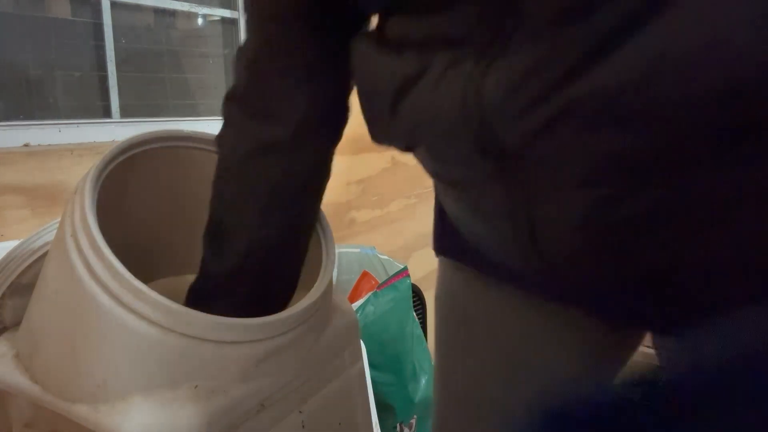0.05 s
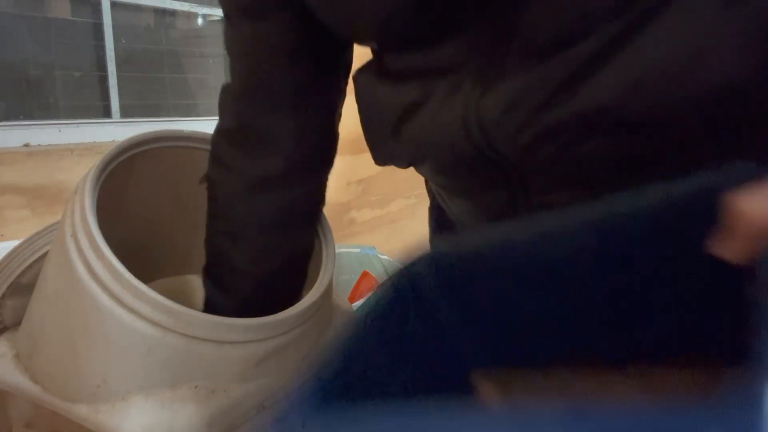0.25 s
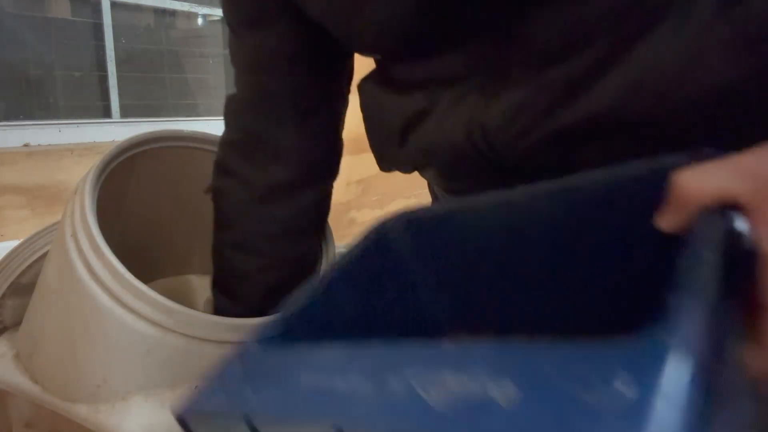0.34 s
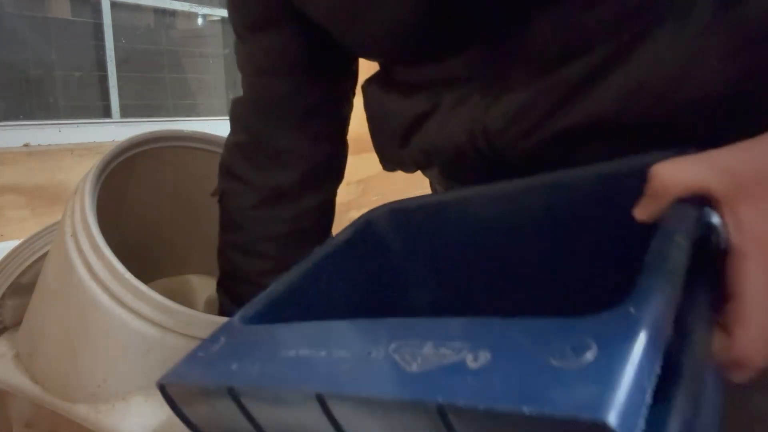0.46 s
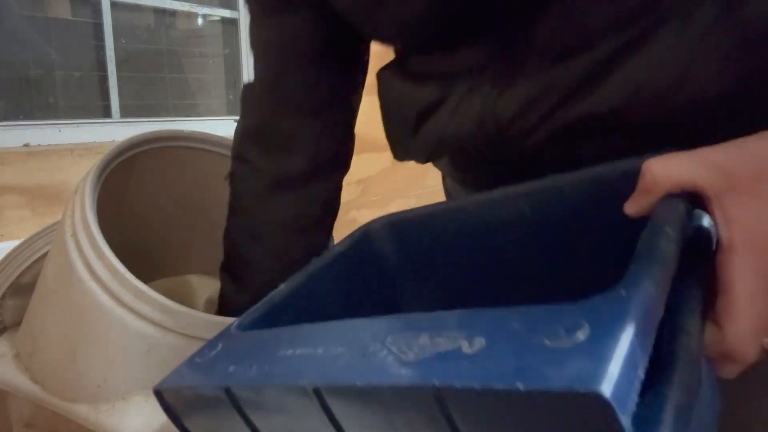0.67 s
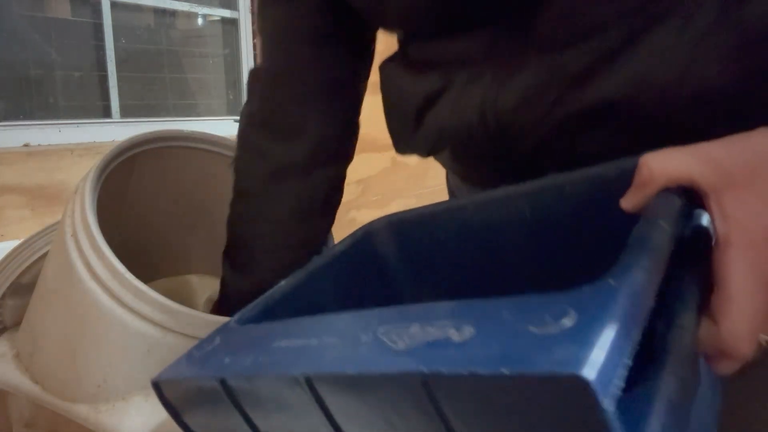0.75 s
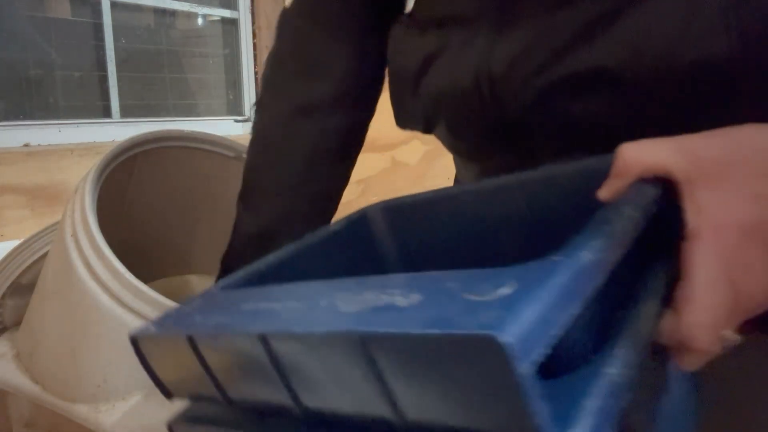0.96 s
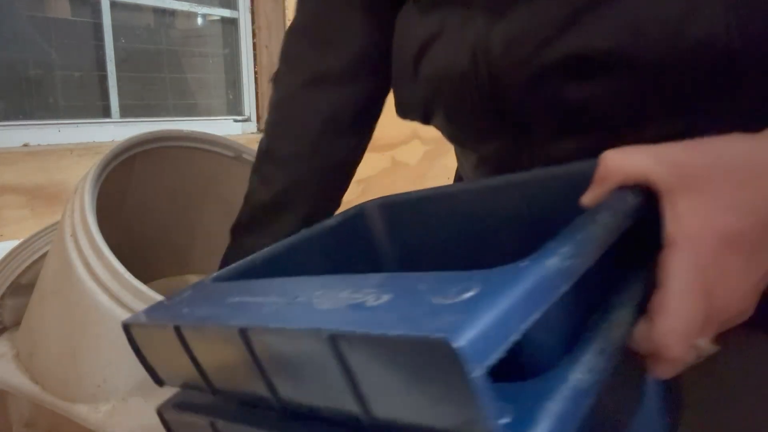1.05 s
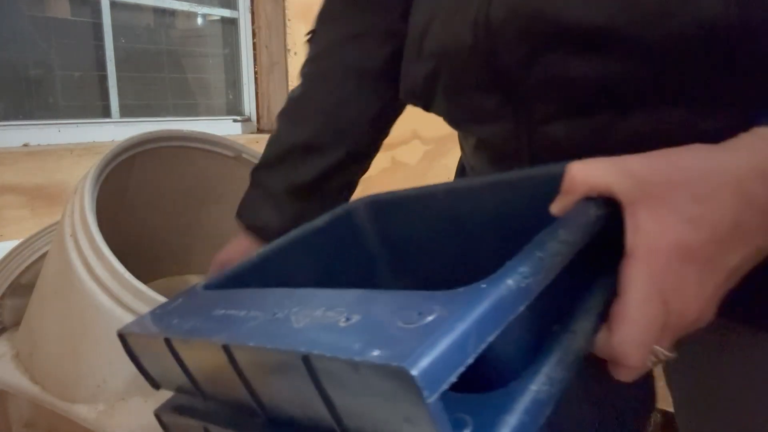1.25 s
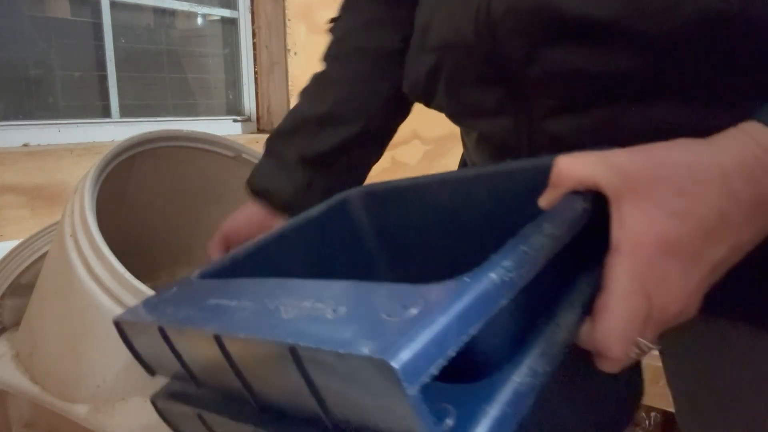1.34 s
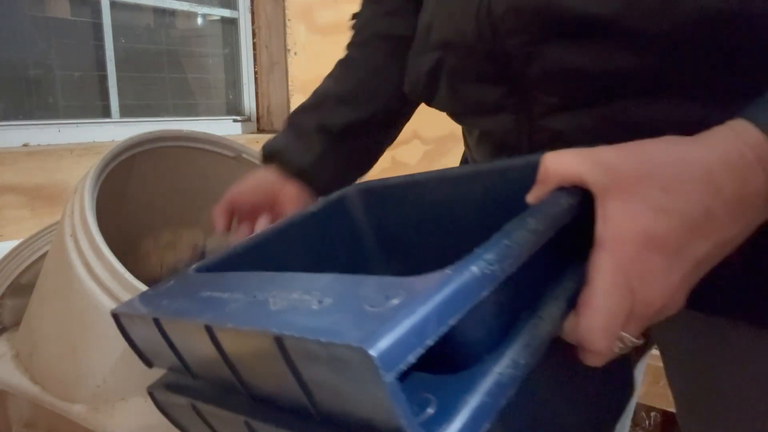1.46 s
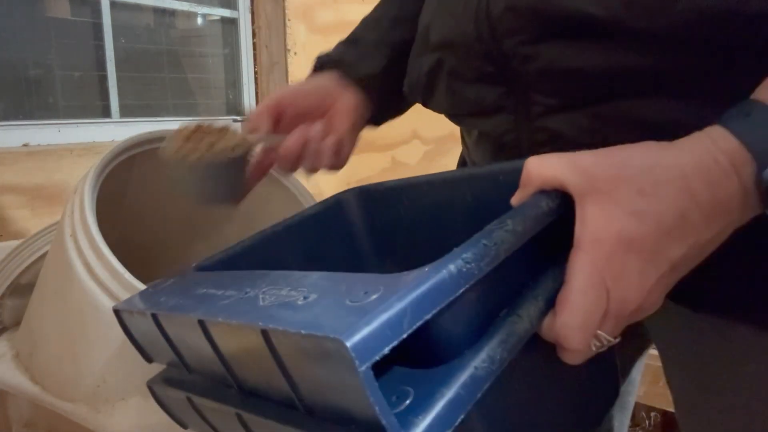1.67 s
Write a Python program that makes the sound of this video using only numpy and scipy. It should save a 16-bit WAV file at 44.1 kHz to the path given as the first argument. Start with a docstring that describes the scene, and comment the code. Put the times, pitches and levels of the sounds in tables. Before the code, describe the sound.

Close, dry recording in a small feed room: pellets hiss and grind, the barrel wall booms under the digging scoop, loose pellets crackle and tick as it lifts, then a sharp tap and quiet.

```python
"""A metal scoop digs through feed pellets in a plastic barrel, close by, in a small feed room.
Pellets crunch, hiss and snap: random trains of tiny collisions, filtered to each sound's spectrum.
The push rumbles and drones in the barrel wall; knocks, booms and clacks are decaying oscillations.
Most layers pass through a short diffuse reverberation, the hollow of barrel and room."""
import sys
import numpy as np
from scipy import signal
from scipy.fft import rfft, irfft
from scipy.io import wavfile

SR = 44100
rng = np.random.default_rng(int(sys.argv[2]) if len(sys.argv) > 2 else 0)


def wav_out(sig):
    """Save sig, one row per channel (or a flat mono array), as 16-bit PCM at SR to the path in sys.argv[1]."""
    wavfile.write(sys.argv[1], SR, np.round(np.clip(np.atleast_2d(sig).T, -1, 1) * 32767).astype(np.int16))


N = 74970
TIME = np.arange(N) / SR  # seconds

# spectrum of pellets grinding, also the duller body of snaps and scrapes: pitch_hz, relative level_db per Hz
GRIND_SPECTRUM = [(60, -47), (140, -6), (300, -7), (650, 0), (1100, 2.5), (1600, -2.5), (2200, -1.5),
                  (3300, -4), (5000, -4.5), (8000, -18), (16000, -34)]
# bright spectrum of single pellets snapping or ticking: pitch_hz, relative level_db per Hz
SNAP_SPECTRUM = [(300, -22), (2000, -11.5), (4500, 0), (7500, -0.5), (9700, 0), (12000, -1), (13500, -0.5),
                 (15000, -10), (16000, -6.5)]


def amp(db):
    """Level in decibels is twenty times the logarithm of the amplitude ratio returned here."""
    return 10 ** (np.asarray(db) / 20)


def unit(x):
    """Root-mean-square normalisation: the mean power becomes 1."""
    return x / np.sqrt(np.mean(x ** 2) + 1e-20)


def level(points):
    """Amplitude envelope: straight lines in decibels become a gain for every sample."""
    time_s, level_db = np.transpose(points)
    return amp(np.interp(TIME, time_s, level_db))


def read(points, hz):
    """Interpolation on a logarithmic frequency axis."""
    f, value = np.transpose(points)
    return np.interp(np.log(hz + 1), np.log(f + 1), value)


def through(x, response):
    """A linear system's output is its input convolved with its impulse response."""
    return signal.fftconvolve(np.atleast_2d(x), np.atleast_2d(response), axes=1)[:, :N]


def colour(spectrum, size=4096):
    """Minimum-phase filter: the Hilbert transform of the log gain gives the phase; energy 1."""
    hz = abs(np.fft.fftfreq(size, 1 / SR))
    log_gain = np.log(amp(read(spectrum, hz)))
    transfer = np.exp(signal.hilbert(log_gain).conj())
    h = np.fft.ifft(transfer).real[:size // 2]
    return h / np.linalg.norm(h)


def ring(modes):
    """Modal superposition: an impulse excites exponentially dying cosines; energy 1."""
    t = TIME[:SR // 2]
    h = np.zeros(len(t))
    for k, (hz, db, t60) in enumerate(modes):
        sign = (-1) ** k  # neighbouring modes start in opposite directions
        h += sign * amp(db - 60 * t / t60) * np.cos(2 * np.pi * hz * t)
    return h / np.linalg.norm(h)


def grains(per_s, spread_db, clump_db, clump_s):
    """Granular shot noise: random collisions of uneven size whose strength swells in clumps."""
    size = amp(spread_db * np.minimum(rng.exponential(1, N), 4))
    struck = rng.random(N) < per_s / SR
    clicks = size * rng.choice([-1, 1], N) * struck
    knots = rng.standard_normal(N)
    clumps = amp(clump_db * np.interp(TIME / clump_s, np.arange(N), knots))
    return unit(clicks * clumps)


def waver(hz, wander_hz, flutter_db, step_s):
    """Random frequency and amplitude modulation of a sine, whose phase is its summed frequency."""
    knots = rng.standard_normal((2, N))
    pitch, size = [np.interp(TIME / step_s, np.arange(N), k) for k in knots]
    phase = 2 * np.pi * np.cumsum(hz + wander_hz * pitch) / SR
    return unit(amp(flutter_db * size) * np.sin(phase))


def hollow(x, wet_db, mono_hz=170):
    """Diffuse reverberation: decaying noise, coherent between the sides only in the bass."""
    # decay of the reflections: pitch_hz, t60_s
    decay = [(100, 0.071), (700, 0.18), (3000, 0.12), (8000, 0.046), (16000, 0.035)]
    # phase by which the left side leads the right: pitch_hz, lead_rad
    left_lead = [(0, 0.65), (1380, 0.51), (2670, 1.88), (3450, 0.58), (4390, 4.48), (5600, 4), (6200, 0.73),
                 (6720, 2.06), (7580, 0.5), (10100, 3.6), (11700, 6.7), (12900, 7.3), (14000, 9.3),
                 (16000, 9.6)]
    hz, t, z = signal.stft(rng.standard_normal((2, SR // 3)), SR, nperseg=256)
    same = 1 / (1 + (hz[:, None] / mono_hz) ** 2)
    z[1] = same * z[0] + np.sqrt(1 - same ** 2) * z[1]
    fading = amp(-60 * t / read(decay, hz)[:, None])
    tail = signal.istft(z * fading, SR, nperseg=256)[1]
    tail /= np.linalg.norm(tail[0])
    left = x[0]
    lag = np.exp(-1j * read(left_lead, np.fft.rfftfreq(N, 1 / SR)))
    right = irfft(rfft(left) * lag, N)
    direct = np.array([left, right])
    return (direct + amp(wet_db) * through(left, tail)) / np.hypot(1, amp(wet_db))


def room_tone(level_db=-49):
    """Partly correlated noise: quiet steady air, its sides sharing a little of one random source."""
    # spectrum of the air: pitch_hz, relative level_db per Hz
    air_spectrum = [(20, 8), (50, 13.5), (120, 2), (200, -7), (500, -2.5), (2000, -5.5), (8000, -8),
                    (13000, -10.5), (16000, -22)]
    own, shared = rng.standard_normal((2, N)), rng.standard_normal(N)
    return amp(level_db) * unit(through(shared + 3.1 * own, colour(air_spectrum)))


def wall_hum(drone_hz=97.7, groan_hz=191):
    """Narrow-band vibration: digging shakes a low wall mode, and the juddering scoop makes it groan."""
    # drone shaken by the digging: time_s, level_db
    drone_level = [(0, -60), (.16, -59), (.2, -39), (.28, -32.5), (.32, -23), (.44, -23.5), (.47, -24.5),
                   (.56, -24), (.64, -32), (.7, -38), (.79, -25), (.85, -37), (.93, -33.5), (1.02, -58),
                   (1.12, -46), (1.3, -45.5), (1.42, -50.5), (1.7, -66)]
    drone = level(drone_level) * waver(drone_hz, wander_hz=14, flutter_db=3, step_s=.012)
    # the scoop judders along the wall as it is drawn up
    start_s, end_s, groan_db, fade_s = .78, 0.99, -28.5, 0.06
    gate = np.clip(np.minimum(TIME - start_s, end_s - TIME) / fade_s, 0, 1)
    groan = waver(groan_hz, wander_hz=12, flutter_db=4, step_s=.01)
    return drone + amp(groan_db) * gate * groan


def rumble():
    """Stick-slip excitation: the packed feed shakes the upper modes of the barrel wall."""
    # force of the scoop dragging on the wall, before the layer gains: time_s, level_db
    push = [(0, -49.5), (.07, -37), (.15, -40.5), (.21, -31), (.23, -16.5), (.28, -30), (.37, -19),
            (.41, -23.5), (.49, -27.5), (.54, -25), (.57, -11), (.6, -20), (.66, -30), (.74, -30.5),
            (.78, -29.5), (.83, -30.5), (.92, -29.5), (1.0, -47.5), (1.3, -51.5), (1.42, -45), (1.7, -63.5)]
    # broad spectrum of the wall: pitch_hz, relative level_db per Hz
    wall_spectrum = [(20, -20), (48, -4), (80, -26.5), (140, -7.5), (230, 2), (300, 0), (450, -5),
                     (800, -14.5), (1500, -16), (4000, -75), (16000, -94)]
    # modes of the barrel: pitch_hz, relative level_db, t60_s
    barrel_modes = [(185, 7, 0.11), (236.8, 3, 0.13), (288, -7.5, 0.04), (332, -11, 0.046),
                    (408, -13, 0.18), (643, -1.5, 0.12), (678, 4, 0.046), (887, -6, 0.12)]
    drive = grains(per_s=1200, spread_db=1.5, clump_db=2.5, clump_s=0.0098) * level(push)
    broad = amp(1.0) * through(drive, colour(wall_spectrum))
    modal = amp(-5) * through(drive, ring(barrel_modes))
    return hollow(broad + modal, wet_db=-7) * amp_sides(-.7, .7)


def booms(pitch_hz=108, t60_s=0.12):
    """Damped oscillation: deep blows heave the whole wall, which swings at one low mode and dies away."""
    # blows: start_s, level_db
    blows = np.array([(0.596, -0.5), (.607, -7.5), (0.77, -14.5)])
    t = np.maximum(TIME - blows[:, :1], 0)
    decay = np.exp(-np.log(1000) * t / t60_s)  # down 60 dB after t60_s
    return amp(blows[:, 1]) @ (decay * np.sin(2 * np.pi * pitch_hz * t))


def knocks(swell_cycles=0.61):
    """Local impact response: each struck patch swings for a few cycles and stirs the barrel's modes."""
    # scoop bumping the barrel, level ahead of the swing's envelope: start_s, level_db, pitch_hz
    bumps = [(.072, -24, 313), (.215, -19, 455), (0.221, -21, 795), (.227, -16.5, 345), (.233, -13, 218),
             (.236, -19, 685), (0.245, -21.5, 437), (.258, -21, 251), (0.361, -8.5, 259), (0.377, -18, 161),
             (0.398, -23, 350), (.441, -19, 298), (.572, -5.5, 720), (0.576, -4.5, 377), (.583, -4, 650),
             (0.5853, -1.5, 258), (.607, -3.5, 208), (0.765, -12, 280), (0.77, -11.5, 214)]
    # modes of the barrel: pitch_hz, relative level_db, t60_s
    barrel_modes = [(185, 7, 0.11), (236.8, 3, 0.13), (288, -7.5, 0.04), (332, -11, 0.046),
                    (408, -13, 0.18), (643, -1.5, 0.12), (678, 4, 0.046), (887, -6, 0.12)]
    patches = np.zeros(N)
    for start, db, hz in bumps:
        cycles = np.maximum(TIME - start, 0) * hz
        u = cycles / swell_cycles
        swell = u * np.exp(1 - u)  # peaks at 1 when u is 1
        patches += amp(db) * swell * np.sin(2 * np.pi * cycles)
    stirred = amp(-36) * through(patches, ring(barrel_modes))
    return hollow(patches + stirred, wet_db=-11)


def clacks():
    """Impulse excitation: a hard tap rings the scoop's lightly loaded modes as it comes clear."""
    # hard taps: start_s, level_db
    hard_taps = [(1.2205, -10), (1.3494, 3.5), (1.3665, -6), (1.4556, -26)]
    # modes of the lifted scoop: pitch_hz, relative level_db, t60_s
    lifted_modes = [(500, -5, 0.037), (670, 3.5, 0.056), (775, 5, 0.045), (1310, 1, 0.03), (2017, 6, 0.051),
                    (3218, -4, 0.032), (3516, -9, 0.06), (4830, 2, 0.061), (7120, 8.5, 0.039),
                    (7600, 5, 0.023)]
    taps = np.zeros(N)
    for start, db in hard_taps:
        taps[round(start * SR)] = amp(db)
    return hollow(through(taps, ring(lifted_modes)), wet_db=-9)


def ticks(start_s=.92, end_s=1.3, fade_s=0.04, level_db=-30):
    """Sparse random impacts: loose pellets spill from the rising scoop and tick one by one."""
    spill = np.clip(np.minimum(TIME - start_s, end_s - TIME) / fade_s, 0, 1)
    impacts = grains(per_s=280, spread_db=5.0, clump_db=8.0, clump_s=.01)
    drive = impacts * spill * amp(level_db)
    return hollow(through(drive, colour(SNAP_SPECTRUM)), wet_db=-1)


def scrapes(fade_s=0.0067):
    """Sustained modal excitation: pellets rasp along the metal and keep its modes ringing."""
    # hard scrapes through the feed, before the layer gains: start_s, end_s, level_db
    strokes = [(0.54, 0.591, -16.5), (0.722, 0.753, -20), (0.924, 1.023, -25.5)]
    # resonances of the blade: pitch_hz, relative level_db, t60_s
    blade_modes = [(1880, -11.5, 0.07), (2280, 1, 0.035), (2796, -1.5, 0.048), (3140, 2.5, 0.014),
                   (3670, 6, 0.0051)]
    effort = np.zeros(N)
    for start, end, db in strokes:
        effort += amp(db) * np.clip(np.minimum(TIME - start, end - TIME) / fade_s, 0, 1)
    drive = grains(per_s=2400, spread_db=2.5, clump_db=1, clump_s=0.005) * effort
    ringing = amp(-4) * through(drive, ring(blade_modes))
    grinding = amp(-4.5) * through(drive, colour(GRIND_SPECTRUM))
    return hollow(ringing + grinding, wet_db=-2)


def slide():
    """Sliding friction as dense micro-impacts: fine bright grains as the feed slips along the metal."""
    # pellets and sleeve sliding: time_s, level_db
    slide_level = [(0, -38.5), (.07, -29.5), (.2, -35.5), (.28, -34.5), (.33, -22), (.365, -22.5),
                   (.395, -35), (.425, -26.5), (.49, -43.5), (.535, -32.5), (.572, -20.5), (.605, -39.5),
                   (.68, -36.5), (.725, -34), (.745, -34), (.785, -27), (.86, -35), (.91, -29),
                   (.955, -23.5), (1.02, -25.5), (1.05, -27.5), (1.14, -34), (1.195, -34), (1.24, -29.5),
                   (1.33, -40), (1.5, -47.5), (1.7, -57)]
    # bright spectrum of the sliding: pitch_hz, relative level_db per Hz
    slide_spectrum = [(300, -34.5), (2000, -2), (5000, -3), (8000, -3), (9700, -3.5), (12000, -1.5),
                      (13500, -2.5), (15000, -27), (16000, -98)]
    drive = grains(per_s=8100, spread_db=4, clump_db=1.5, clump_s=0.0024) * level(slide_level)
    return hollow(through(drive, colour(slide_spectrum)), wet_db=1.0)


def snaps(rise_s=0.00032, fall_s=0.0015):
    """Fracture-like bursts: milliseconds of cracking at the edge, and one impulse that rings the scoop."""
    # pellets snapping, before the layer gains; dull part and ring relative to level_db:
    # start_s, level_db, length_s, dull_db, ring_db
    bursts = [(.516, -29.5, 0.009, 5, -13), (0.645, -32, 0.007, 10, -19), (0.735, -22, 0.01, 6, -5),
              (0.752, -19.5, 0.0044, 5, -20), (0.7596, -3.5, 0.0039, -15.5, -28),
              (0.8763, -12, 0.0038, -22.5, -29.5), (0.9222, -8, 0.0035, -23, -29),
              (0.941, -11.5, 0.0036, -15, -3), (0.953, -14, 0.0052, -0.5, 3.5),
              (0.9597, -13, 0.0059, -8, -28), (0.9764, -8, 0.0015, -21, -17),
              (0.9891, -13.5, 0.0056, 0, -21), (1.0123, -18.5, 0.011, 2.5, 5.5),
              (1.025, -7, 0.0028, -22, -13), (1.035, -11, 0.0031, -24, -24),
              (1.06, -19.5, 0.0095, -4.5, -2.5), (1.075, -14.5, 0.0029, -17, -6),
              (1.0938, -11, 0.0026, -27, -18), (1.1113, -8.5, 0.0032, -27, -28),
              (1.1617, -26, 0.0086, -0.5, 7.5), (1.2108, -16.5, 0.0062, -14, -20),
              (1.219, -8, 0.0028, -9, 1.5), (1.232, -28, 0.0031, -4, 18), (1.245, -15, 0.0052, -14, 6.5),
              (1.274, -11.5, 0.0023, -14, -17), (1.28, -20, 0.007, -7.5, 7.5),
              (1.3489, -9, 0.0025, -13, -2), (1.3668, -21.5, 0.0014, -5, -0.5),
              (1.4556, -36.5, 0.006, 7, -16), (1.666, -39.5, 0.0076, -14, -28)]
    # modes of the scoop, damped by the feed: pitch_hz, relative level_db, t60_s
    scoop_modes = [(640, -3, 0.025), (765, 2, 0.043), (1100, -7, 0.033), (1660, 7, 0.03),
                   (1980, -28, 0.027), (2810, 0, 0.033), (3090, 19.5, 0.0095), (3553, 14, 0.027),
                   (4560, -3, 0.01), (5540, 17.5, 0.011), (7910, 15.5, 0.018)]
    bright, dull, taps = np.zeros((3, N))
    for start, db, length, dull_db, ring_db in bursts:
        t = TIME - start
        attack = np.clip(t / rise_s, 0, 1)
        release = np.exp(-np.maximum(t - length, 0) / fall_s)
        shape = amp(db) * attack * release
        bright += shape
        dull += shape * amp(dull_db)
        taps[round((start + length / 2) * SR)] = amp(db + ring_db)
    cracks = [grains(per_s=9000, spread_db=2.5, clump_db=2.5, clump_s=0.0007) for _ in range(2)]
    edge = through(bright * cracks[0], colour(SNAP_SPECTRUM))
    thud = amp(-1.5) * through(dull * cracks[1], colour(GRIND_SPECTRUM))
    ringing = amp(15.5) * through(taps, ring(scoop_modes))
    bright_part = hollow(edge, wet_db=-9.5) * amp_sides(.3, -.3)
    return bright_part + hollow(thud + ringing, wet_db=-4) * amp_sides(-.7, .7)


def crunch():
    """Granular collision noise: pellets grind against each other deep in the barrel."""
    # grinding, before the balance of the sides: time_s, level_db
    crunch_level = [(0, -45), (.07, -38.5), (.21, -31.5), (.23, -32), (.25, -37.5), (.29, -31),
                    (.335, -28.5), (.4, -27.5), (.45, -24), (.49, -34.5), (.52, -22), (.55, -22.5),
                    (.58, -28), (.605, -33.5), (.69, -22), (.745, -25), (.79, -25), (.85, -26.5), (.9, -24),
                    (.955, -16.5), (1.02, -35.5), (1.05, -34.5), (1.11, -26.5), (1.165, -24.5), (1.2, -43),
                    (1.235, -23), (1.285, -32), (1.32, -39.5), (1.39, -40.5), (1.44, -49.5), (1.52, -54),
                    (1.7, -55.5)]
    drive = grains(per_s=1700, spread_db=3.5, clump_db=2.0, clump_s=0.0032) * level(crunch_level)
    return hollow(through(drive, colour(GRIND_SPECTRUM)), wet_db=-1.5) * amp_sides(-.8, .8)


def amp_sides(left_db, right_db):
    """Stereo balance by level difference: one gain for each side."""
    return amp([[left_db], [right_db]])


def scene():
    """Linear superposition: the pressures of all sources add."""
    background = room_tone() + wall_hum() + rumble()
    blows = booms() + knocks() + clacks()
    pellets = ticks() + scrapes() + slide() + snaps() + crunch()
    return background + blows + pellets


def record(dry, low_hz=43, ceiling=0.88, edge_hz=16200):
    """High-pass, soft saturation, low-pass: less deep bass, rounded peaks, then the band limit."""
    thin = signal.sosfilt(signal.butter(3, low_hz, "high", fs=SR, output="sos"), dry)
    held = thin / (1 + (thin / ceiling) ** 6) ** (1 / 6)
    band_limit = signal.firwin(511, edge_hz, window=("kaiser", 9), fs=SR)
    return signal.oaconvolve(held, band_limit[None], "same")


dry = scene()
out = record(dry)
wav_out(out)
```